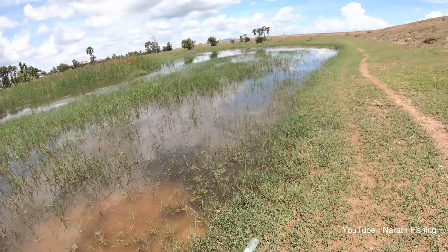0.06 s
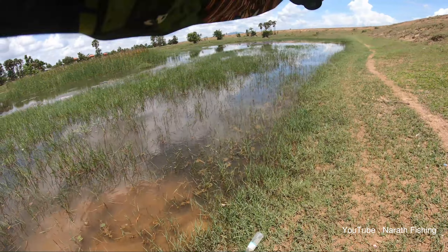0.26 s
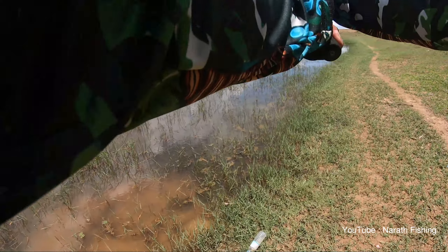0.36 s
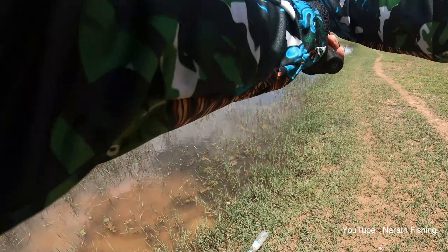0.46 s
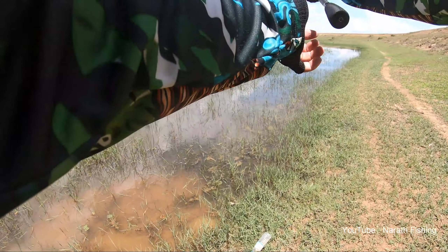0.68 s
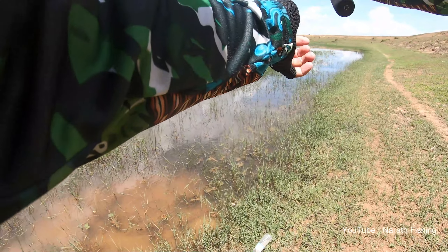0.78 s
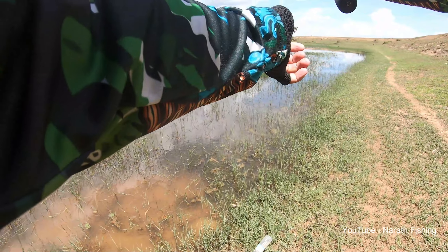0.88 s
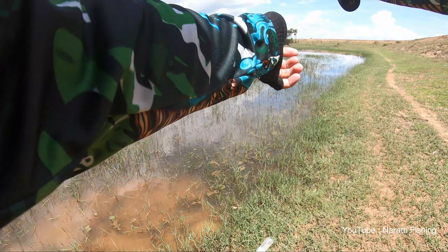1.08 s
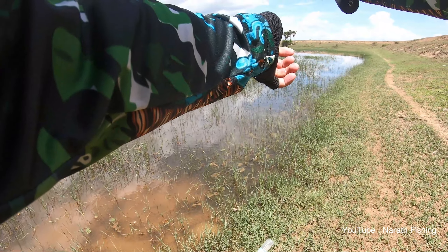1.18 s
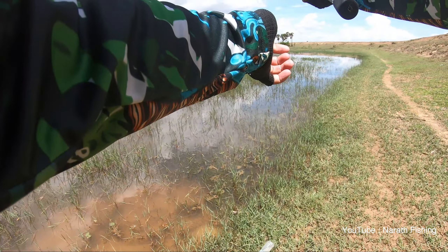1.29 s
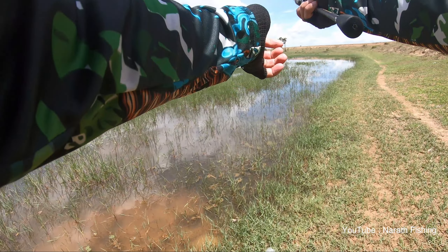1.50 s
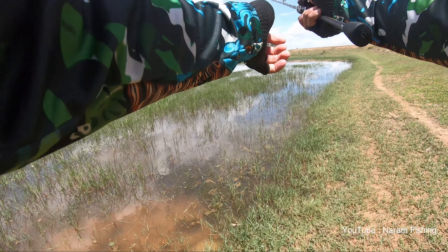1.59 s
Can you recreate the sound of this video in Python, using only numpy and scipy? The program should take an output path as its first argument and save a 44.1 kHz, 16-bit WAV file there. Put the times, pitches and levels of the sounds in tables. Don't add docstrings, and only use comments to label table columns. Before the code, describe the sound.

Close, body-worn microphone at an open pond bank: cloth rubs and knocks, a rod swishes sharply, line hisses away and the reel whine drops, then light ticks; low wind thumps on the right, thin bird and insects far off.

```python
import sys
import numpy as np
from scipy import signal
from scipy.fft import rfft, irfft
from scipy.io import wavfile

SR = 44100
rng = np.random.default_rng(int(sys.argv[2]) if len(sys.argv) > 2 else 0)


def dump(signal):
    limited = np.clip(np.atleast_2d(signal).T, -1, 1)
    pcm = np.round(limited * 32767).astype(np.int16)
    wavfile.write(sys.argv[1], SR, pcm)


def voltage_ratio(level):
    return 10 ** (np.asarray(level, float) / 20)


N = 72765
T = np.arange(N) / SR


def rms_one(x):
    return x / np.sqrt(np.mean(x ** 2) + 1e-20)


def curve(rows):
    return voltage_ratio(np.interp(T, *np.transpose(rows)))


def at_hz(points, hz):
    table_hz, value = np.array(points).T
    return np.interp(np.log(hz + 1), np.log(table_hz), value)


def drift(rate):
    r = np.exp(-2 * np.pi * rate * 40 / SR)
    slow = signal.lfilter([1], [1, -2 * r, r * r], rng.standard_normal(N // 40 + 2002))
    slow = slow[2000:]
    return np.interp(np.arange(N) / 40, np.arange(len(slow)), rms_one(slow))


def bump(s, length):
    return np.exp(-.5 * ((T - s) / (.5 * length)) ** 2)


def ring(s, hz, t60):
    age = np.maximum(T - s, 0)
    return np.sin(2 * np.pi * hz * age) * voltage_ratio(-60 * age / t60)


def onset(s, rise):
    return np.clip((T - s) / rise, 0, 1)


def coloured(spectrum, patchy_db, rate):
    hz = np.fft.rfftfreq(N, 1 / SR)
    lowest, highest = spectrum[0][0], spectrum[-1][0]
    below_db = 17 * (hz < .7 * lowest)
    above_db = 60 * np.log2(np.maximum(hz / highest, 1))
    white = rfft(rng.standard_normal((3, N)))
    white = white * voltage_ratio(at_hz(spectrum, hz) - below_db - above_db)
    out = 0
    for centre in np.arange(np.log2(lowest) - 1, np.log2(highest) + 1, .5):
        share = np.clip(1 - 2 * np.abs(np.log2(hz + 1) - centre), 0, 1)
        out = out + irfft(white * share, N) * voltage_ratio(patchy_db * drift(rate))
    return rms_one(out)


def point(x):
    return np.array([x, np.roll(x, 23), np.roll(x, 61)])


def ports(x):
    # (frequency [Hz], lead [rad])
    phase_lead = [(300, 3.5), (1000, 3.5), (1700, 1.83), (3100, 0.73), (4500, 0.54), (5800, 1.63),
                  (7500, 2), (10000, -1)]
    # (frequency [Hz], difference [dB])
    tilt = [(300, 5), (3100, -2), (4500, 2), (6800, 7.5), (9000, 2.5), (15000, 2)]
    # (frequency [Hz], share [0..1])
    diffuse = [(300, 0.24), (1000, 0.19), (3500, 0.09), (6000, 0.05), (10000, 0.82), (15000, 1)]
    x = np.pad(x, ((0, 0), (1024, 1024)), "reflect")
    hz = np.fft.rfftfreq(x.shape[1], 1 / SR)
    spec = rfft(x)
    share = np.clip(at_hz(diffuse, hz), 0, 1)
    turn = np.exp(1j * np.outer([0, 1], at_hz(phase_lead, hz)))
    direct = spec[0] * turn * np.sqrt(1 - share)
    both = direct + spec[1:] * np.sqrt(share)
    both = both * voltage_ratio(np.outer([.5, -.5], at_hz(tilt, hz)))
    return irfft(both, x.shape[1])[:, 1024:-1024]


def field():
    # (time [s], level [dB])
    insect_level = [(0, -90), (.5, -64), (.9, -67.5), (1.15, -66), (1.45, -69), (1.55, -85), (1.65, -78)]
    # (frequency [Hz], density [dB per Hz])
    hiss_colour = [(300, 6), (500, 2), (950, 10), (2000, 0.5), (4500, -5), (6500, -15), (9500, -13),
                   (13000, -25)]
    song_hz, half_width_hz, throb_hz = 7650, 1500, 70
    band = [(song_hz - half_width_hz, -30), (song_hz, 0), (song_hz + half_width_hz, -30)]
    throb = np.sin(2 * np.pi * np.cumsum(throb_hz + 12 * drift(9.6)) / SR)
    insects = coloured(band, patchy_db=1.5, rate=5.0)
    insects = insects * voltage_ratio(2.5 * throb + 2.5 * drift(51)) * curve(insect_level)
    return insects + voltage_ratio(-60) * coloured(hiss_colour, patchy_db=1.8, rate=4.2)


def bird():
    # (time [s], length [s], from [Hz], to [Hz], level [dB])
    strokes = [
        (.015, .04, 7450, 7100, -63),
        (.05, .058, 7050, 5000, -55),
        (.18, .07, 6250, 6950, -55.5),
        (.515, .055, 6350, 6850, -52),
        (.565, .09, 6850, 7050, -63),
        (.855, .065, 6480, 6880, -54.5),
        (.915, .08, 6880, 7150, -64),
        (1.05, .055, 7100, 5400, -66),
    ]
    out = 0
    for s, length, from_hz, to_hz, db in strokes:
        u = np.clip((T - s) / length, 0, 1)
        hz = from_hz + (to_hz - from_hz) * (1.4 * u - .4 * u ** 3)
        swell = np.sin(np.pi * u ** .7) ** .6
        out = out + voltage_ratio(db) * swell * np.sin(2 * np.pi * np.cumsum(hz) / SR)
    return point(out * voltage_ratio(1.5 * drift(40)))


def wind():
    # (time [s], level [dB], eddy pitch [Hz], length [s])
    buffets = [(0.037, -43.5, 70, 0.06), (0.137, -28, 45.5, 0.02), (0.197, -28.5, 95.6, 0.022),
               (0.263, -26, 52.9, 0.049), (0.331, -11, 32.4, 0.034), (0.351, -12.5, 105.2, 0.012),
               (0.392, -24, 46.8, 0.04), (0.439, -18, 56.4, 0.0082), (0.496, -32, 34.5, 0.052),
               (0.532, -34, 57.4, 0.024), (0.592, -27.5, 74, 0.021), (0.737, -27.5, 43, 0.03),
               (0.821, -29, 64.8, 0.013), (0.863, -25, 83, 0.006), (0.914, -30.5, 70, 0.039),
               (0.971, -25.5, 67, 0.017), (1.041, -28, 65.3, 0.014), (1.076, -33, 101.6, 0.014),
               (1.148, -28, 70, 0.0047), (1.289, -32.5, 35, 0.038), (1.36, -41, 88.5, 0.0031),
               (1.532, -41.5, 38.6, 0.021)]
    # (time [s], level [dB])
    gust = [(0.0, -46.5), (.13, -42.5), (.19, -36), (.24, -36), (.262, -26.5), (.29, -35), (0.312, -29),
            (0.348, -23), (0.37, -47), (.388, -28), (.42, -37), (0.444, -39), (0.464, -48), (0.588, -43),
            (0.62, -56), (0.744, -52.5), (0.79, -44.5), (1.158, -57.5), (1.204, -67), (1.33, -60),
            (1.45, -66.5), (1.53, -54.5), (1.6, -58.5), (1.65, -61)]
    # (frequency [Hz], density [dB per Hz])
    flutter_colour = [(25, 7.5), (60, -10.5), (130, 6), (250, -9), (350, -13.5), (430, -28.5)]
    # (time [s], level [dB])
    lee_gust = [(0, -41.5), (.15, -46), (.3, -35), (.45, -42.5), (.8, -48), (1.2, -52.5), (1.45, -54),
                (1.65, -49)]
    # (frequency [Hz], density [dB per Hz])
    lee_colour = [(20, 1), (50, -2), (90, -16), (220, -4), (340, -19.5), (430, -48)]
    wobble = np.cumsum(drift(30.3)) / SR
    thumps = 0
    for (s, db, hz, length), turn in zip(buffets, rng.random(len(buffets))):
        wave = np.sin(2 * np.pi * (hz * (T - s + 0.1318 * wobble) + turn))
        lopsided = wave + 0.49 * wave ** 2 - .1
        thumps = thumps + voltage_ratio(db + 6.5) * bump(s, length * 1.26) * lopsided
    flutter = coloured(flutter_colour, patchy_db=1.5, rate=19.7)[0] * curve(gust) * voltage_ratio(8.5)
    lee = coloured(lee_colour, patchy_db=5.0, rate=3.9)[0] * curve(lee_gust)
    return np.array([lee - voltage_ratio(-28) * thumps, thumps + flutter])


def sleeve():
    # (time [s], level [dB])
    rub_level = [(0, -46), (.09, -44), (.17, -49), (.25, -42), (.262, -34.5), (.288, -36), (.297, -35),
                 (.34, -44.5), (.4, -74.5)]
    # (frequency [Hz], density [dB per Hz])
    cloth_colour = [(400, -6.5), (550, -8.5), (900, 0), (1400, -5), (2100, -11), (3150, -9.5),
                    (3900, -27.5), (10000, -50)]
    # (time [s], peak [dB], ring [Hz], t60 [s])
    shell_knocks = [
        (.283, -25, 900, .04),
        (.3095, -21, 1030, .03),
        (.3245, -23, 1080, .03),
        (.328, -26, 540, .03),
        (.344, -12.5, 850, .013),
        (.359, -25, 1020, .015),
        (.384, -26, 1080, .02),
    ]
    grain = voltage_ratio(2.35 * drift(134))
    rub = coloured(cloth_colour, patchy_db=2.0, rate=19.0) * grain * curve(rub_level)
    knocks = 0
    for s, db, hz, t60 in shell_knocks:
        knocks = knocks + voltage_ratio(db) * ring(s, hz, t60) * onset(s, .0008)
    return rub + point(knocks)


def reel():
    # (multiple, level [dB], fade [dB/s], right port [dB])
    harmonics = [
        (1, -39, 46, -9),
        (5, -45, 32, 0),
    ]
    # (time [s], peak [dB], low mode [Hz], high mode [Hz])
    tick_rows = [
        (0.328, -38, 1640, 2600),
        (1.2354, -34.5, 1300, 2970),
        (1.3058, -27, 780, 1960),
    ]
    high_mode_db = [16, 3.5, -3]
    start_s, spool_hz, sag_hz_per_s = .42, 364.3, 285
    tick_t60_s, tick_cut_hz = 0.0041, 450
    age = np.maximum(T - start_s, 0)
    turns = np.cumsum(spool_hz - sag_hz_per_s * age + .6 * drift(20)) / SR
    fade = np.clip(age / .02, 0, 1) * voltage_ratio(-200 * np.maximum(age - .3, 0) + 1.2 * drift(30))
    whine = 0
    for k, db, fade_db, right_db in harmonics:
        tone = fade * voltage_ratio(db - fade_db * age) * np.sin(2 * np.pi * k * turns)
        whine = whine + ports(point(tone)) * voltage_ratio([[0], [right_db]])
    ticks = 0
    for (s, db, low, high), high_db in zip(tick_rows, high_mode_db):
        modes = ring(s, low, tick_t60_s) - voltage_ratio(high_db) * ring(s, high, tick_t60_s * 0.55)
        ticks = ticks + voltage_ratio(db) * modes * onset(s, 0.00018)
    ticks = signal.sosfilt(signal.butter(2, tick_cut_hz, "high", fs=SR, output="sos"), ticks)
    return whine + ports(point(ticks))


def cast():
    # (time [s], level [dB])
    swish = [(0, -49), (.2, -53.5), (.33, -41.5), (.345, -39), (.356, -30.5), (.38, -29), (.41, -35.5),
             (.44, -39.5), (.62, -48.5), (1.05, -56), (1.3, -63)]
    # (frequency [Hz], density [dB per Hz])
    air_colour = [(400, -6.5), (800, -3.5), (1300, -2), (2000, -6.5), (3000, -9), (5000, -15),
                  (7300, -19.5), (10300, -20.5), (11300, -31), (14500, -34.5)]
    # (time [s], level [dB], centre [Hz], length [s], width [octaves])
    slaps = [(0.27, -40.5, 2450, 0.032, 0.1), (0.274, -39, 3200, 0.034, 0.11), (.329, -40, 2600, .005, .5),
             (0.37, -41, 3030, 0.037, .35), (0.393, -41.5, 9850, 0.032, .05), (0.4, -43, 5000, 0.035, 0.08),
             (.403, -41, 3000, .028, .6), (.407, -43, 6500, .03, .45), (0.564, -51.5, 3740, 0.029, 0.81),
             (0.655, -63, 7030, 0.067, 0.03), (.657, -58, 4250, .025, .02), (0.657, -56, 4550, 0.025, 0.02),
             (.657, -57, 4900, .025, .02), (.675, -60, 9700, 0.056, 0.12), (.68, -64, 12500, .07, .15),
             (.8, -69, 12500, .08, .15), (0.694, -49, 1900, 0.014, 0.7), (0.785, -54, 940, .015, 0.16),
             (0.81, -55, 3360, 0.011, .5), (0.816, -55, 9900, 0.006, 0.07), (0.868, -48, 1250, 0.009, 0.5),
             (0.99, -61, 4400, 0.027, 0.06), (1.03, -69, 10500, .15, .2), (1.115, -63, 9900, 0.012, 0.09),
             (1.154, -52, 3030, .002, 0.25), (1.165, -67, 9550, .025, .04),
             (1.3068, -47, 4700, 0.0012, 0.4), (1.311, -58, 2000, .006, .2), (1.58, -72, 5750, .12, .04)]
    out = coloured(air_colour, patchy_db=0.5, rate=64.0) * curve(swish) * voltage_ratio(0.95 * drift(35))
    hz_axis = np.fft.rfftfreq(N, 1 / SR)
    white = rfft(rng.standard_normal((3, N)))
    for s, db, hz, length, width in slaps:
        band = np.exp(-.5 * (np.log2((hz_axis + 1) / hz) / width) ** 2)
        out = out + voltage_ratio(db) * bump(s, length) * rms_one(irfft(white * band, N))
    return out


def scene():
    return wind() + ports(sleeve() + cast() + bird() + field()) + reel()


def band_limit(x):
    return signal.sosfilt(signal.butter(12, 15600, fs=SR, output="sos"), x)


def record(dry):
    cut = signal.sosfilt(signal.butter(1, 8, "high", fs=SR, output="sos"), dry)
    ends = np.clip(np.minimum(T, T[::-1]) / .003, 0, 1)
    return band_limit(cut * ends)


dry = scene()
out = record(dry)
dump(out)
```